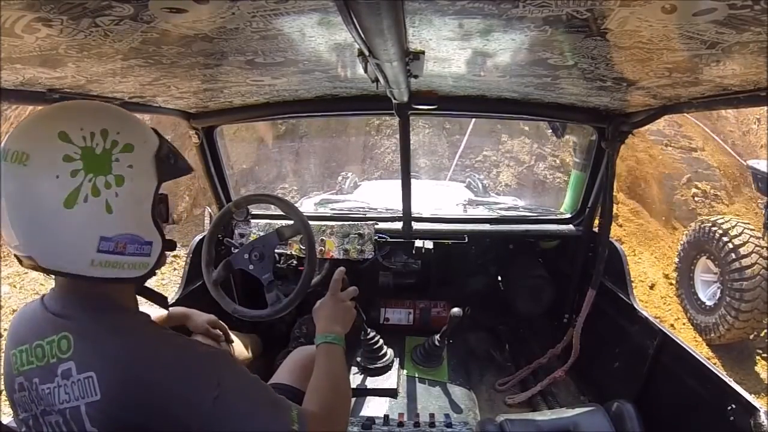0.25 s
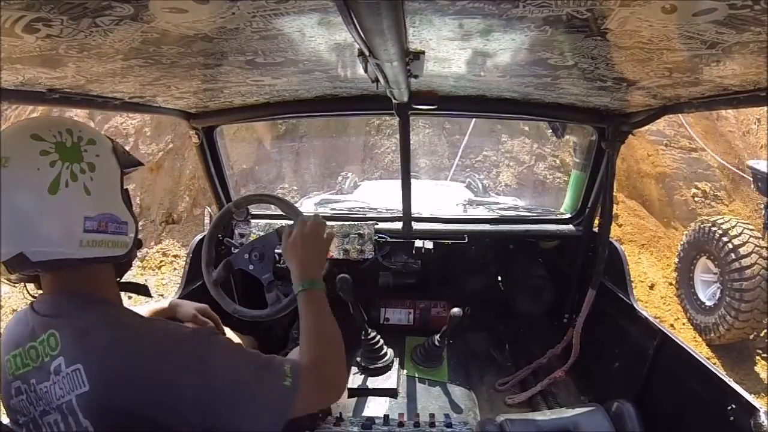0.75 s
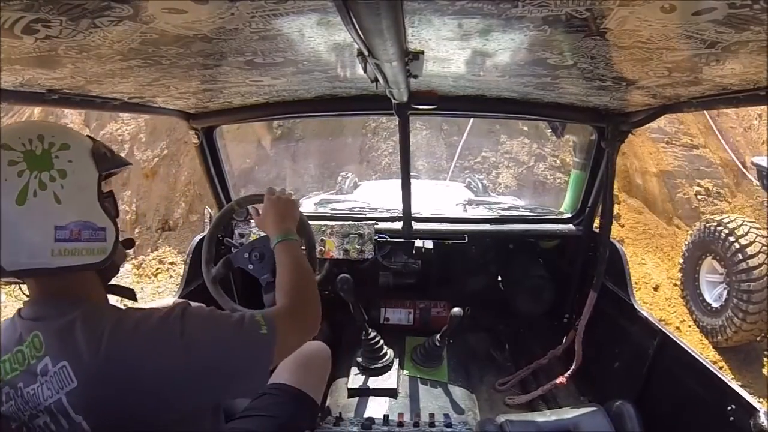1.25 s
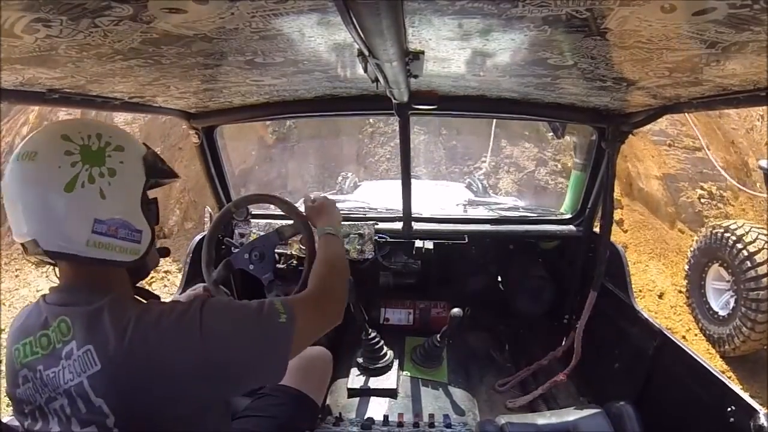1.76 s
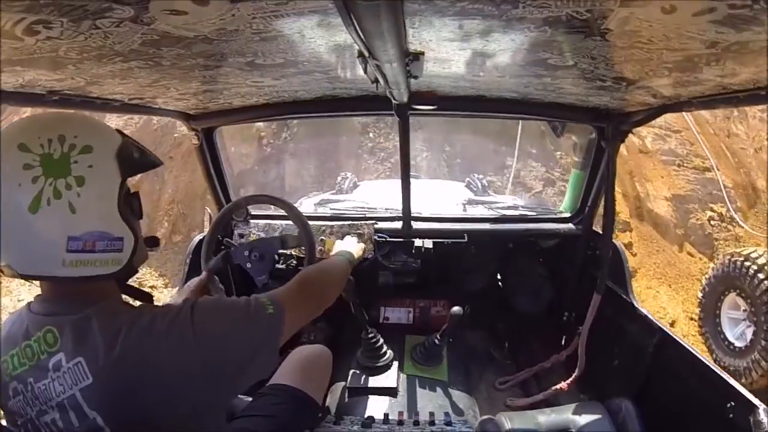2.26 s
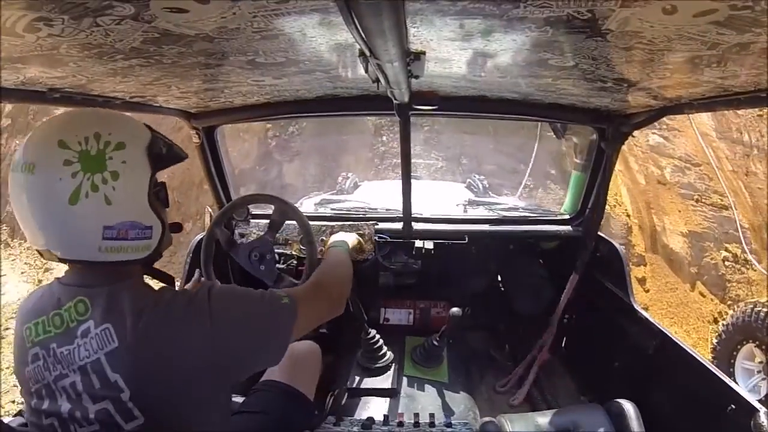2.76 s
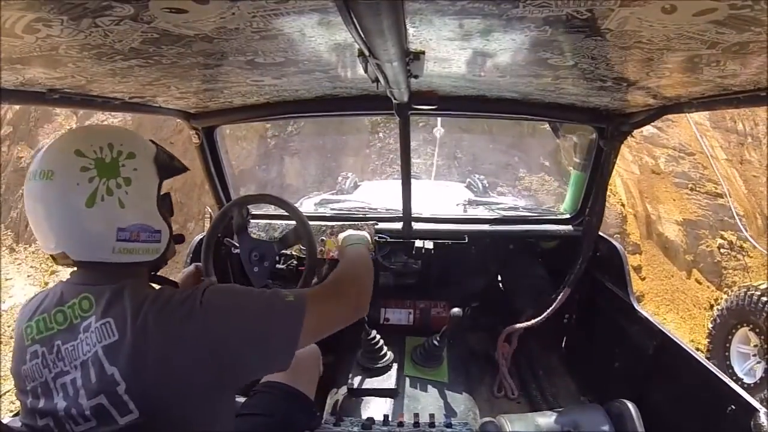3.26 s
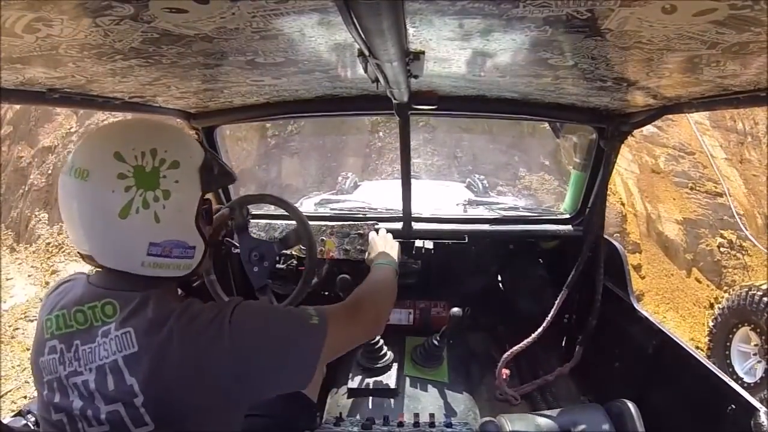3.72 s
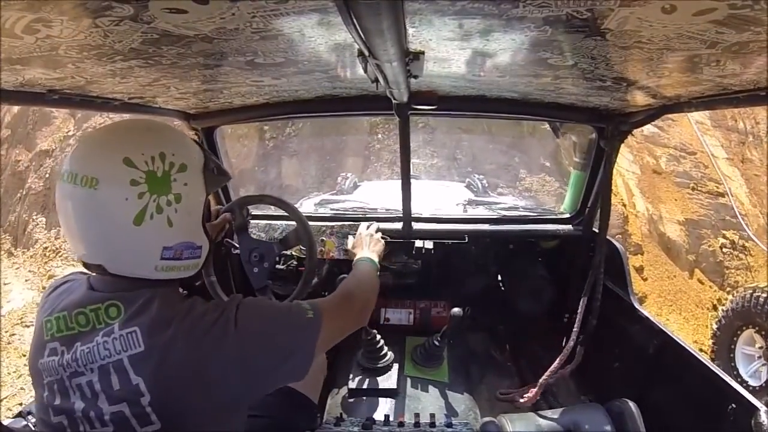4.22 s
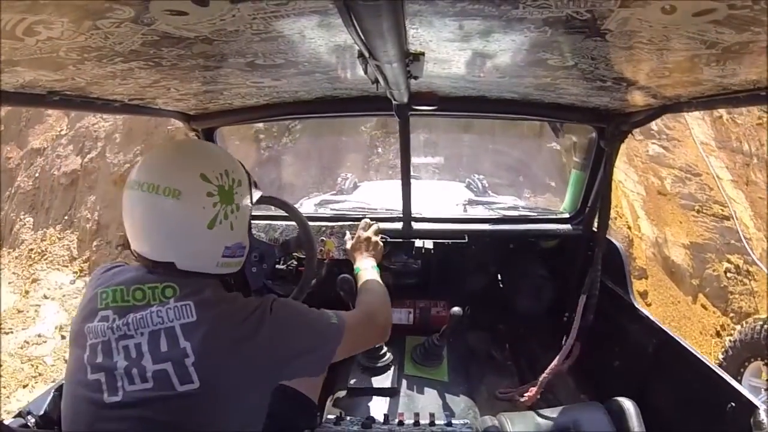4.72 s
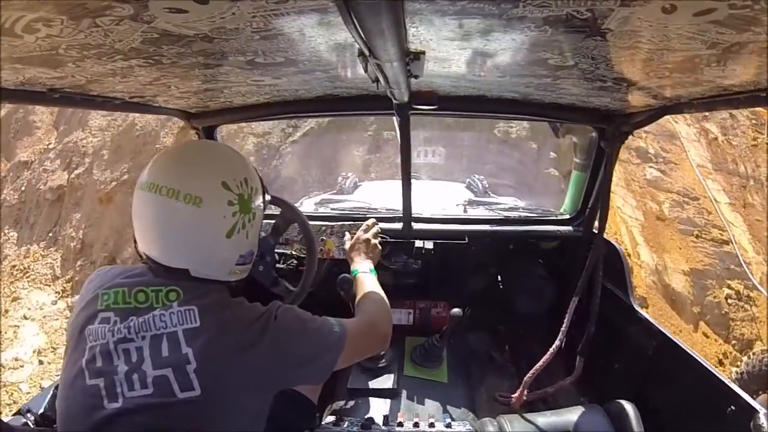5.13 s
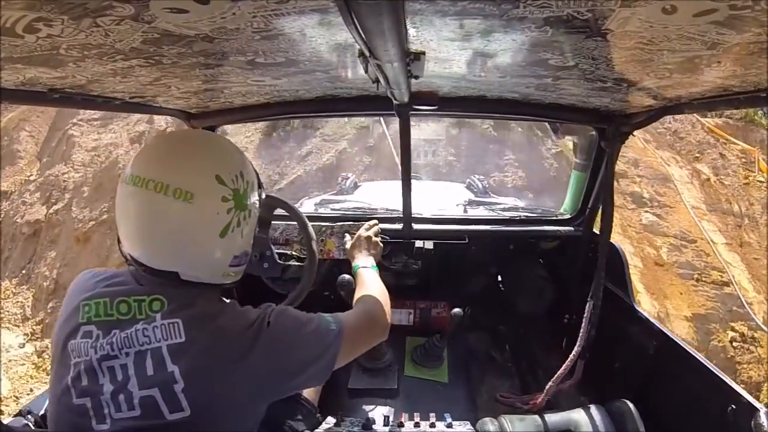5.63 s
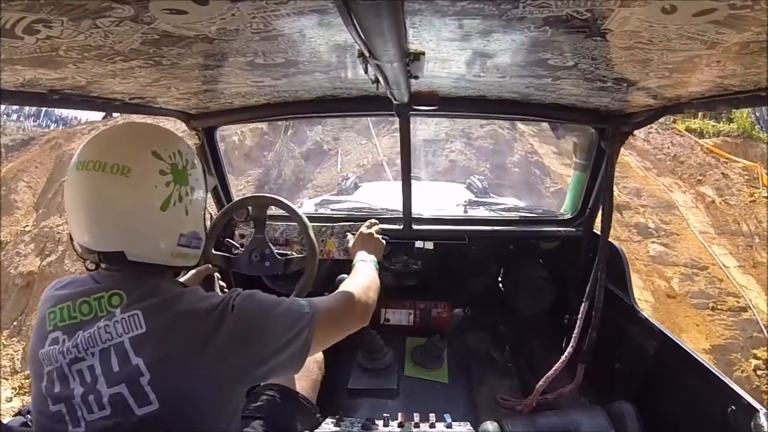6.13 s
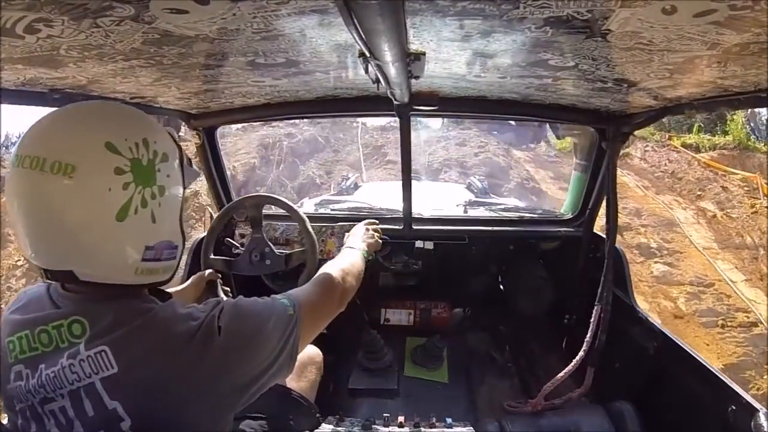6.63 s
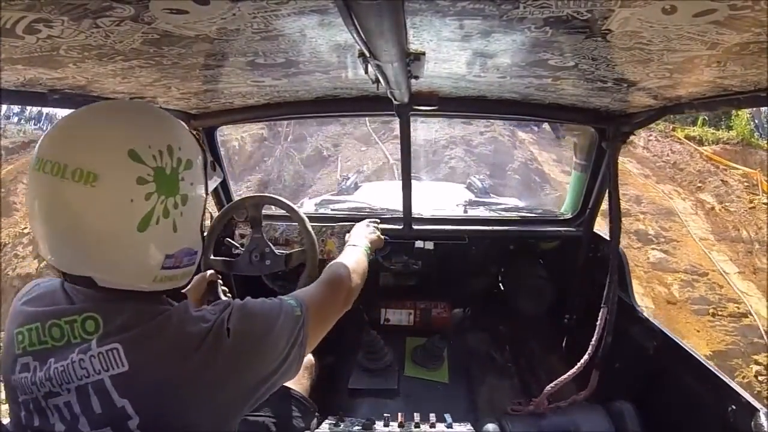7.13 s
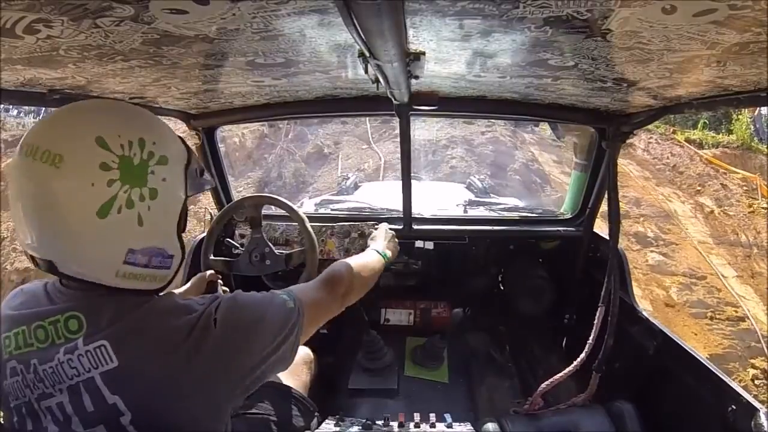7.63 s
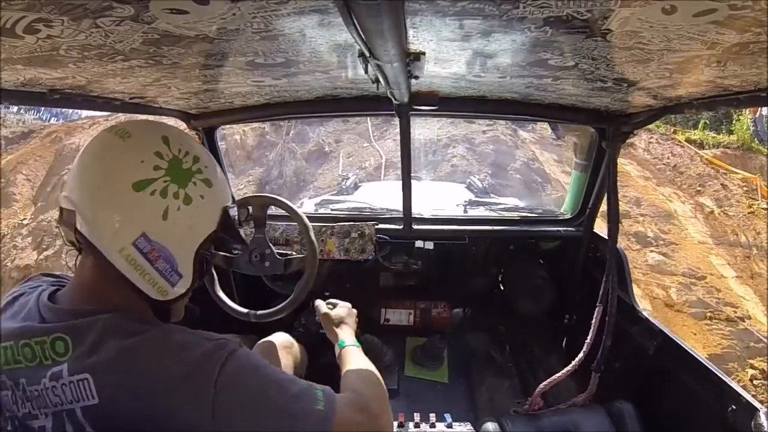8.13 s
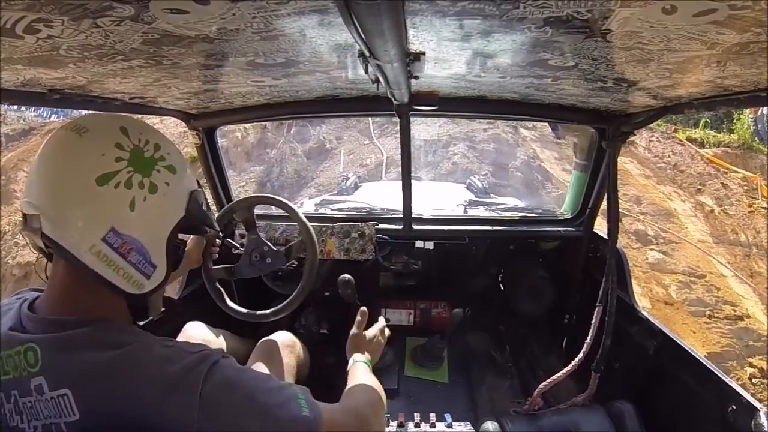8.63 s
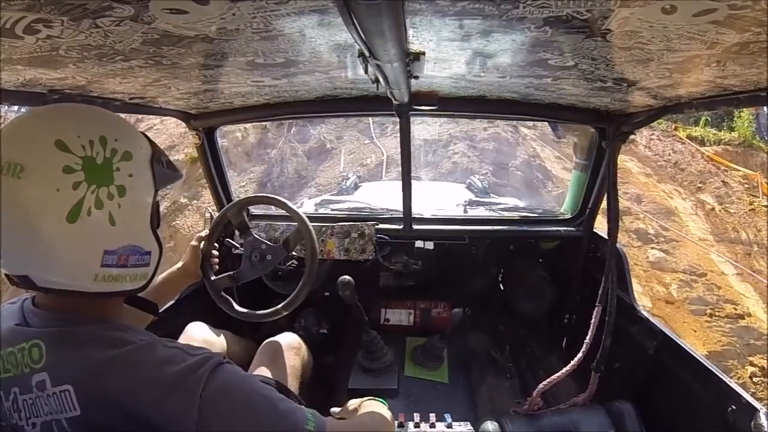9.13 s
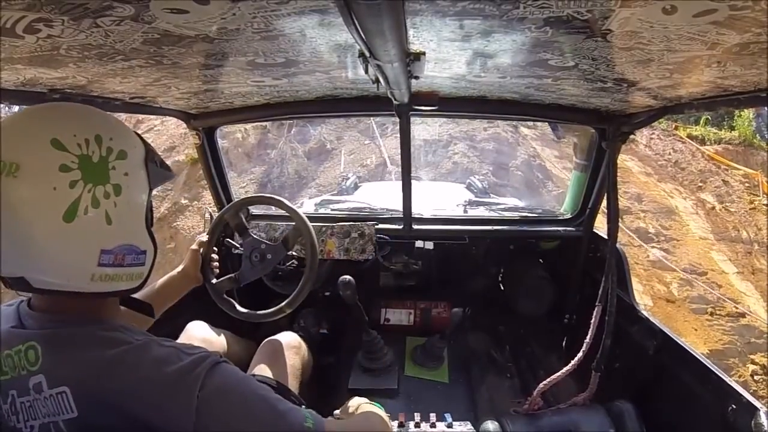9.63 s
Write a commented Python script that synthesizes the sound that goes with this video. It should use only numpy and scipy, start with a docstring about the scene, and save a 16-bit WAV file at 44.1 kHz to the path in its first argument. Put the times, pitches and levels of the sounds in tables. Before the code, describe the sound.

A turbo-diesel buggy crawls uphill on dirt, heard from its open cabin: a booming, clattering engine over chassis rumble and thin intake hiss. A thump and clank hit at 1 second. The engine sags to a ticking near-idle around 2.4 seconds, then picks up with a few bumps. The turbo whistles sharply upward from 3.5 to 4 seconds, with another thump, and winds down faintly by 5.5. The revs sag again near 4.8 and recover. A loose metal part close by starts knocking at 4.3 seconds and rattles rapidly and loudly from 5 to 6.7, in step with the engine. After a slight dip, the revs climb highest around 7 seconds. Heavy thumps, clanks and short squeaks come between 7.5 and 7.8. The rapid knocking returns strongly from 8.6 until the end near 10 seconds, with a squeak at 9.4, as the engine eases.

```python
"""Turbo-diesel buggy on a dirt track.

The microphone rides in the open cabin as the buggy crawls uphill. The engine booms, sags almost to
idle twice and picks up again; the turbo whistles up once and winds down. Close by, a loose part
knocks in step with the engine's shaking, and the chassis thumps, clanks and squeaks over ruts."""
import sys
import numpy as np
from scipy import signal
from scipy.fft import rfft, irfft
from scipy.io import wavfile

SR = 44100
rng = np.random.default_rng(int(sys.argv[2]) if len(sys.argv) > 2 else 0)


def bounce(signal):
    """Save signal as a 16-bit WAV file at the path given by the first command-line argument."""
    frames = np.transpose(np.atleast_2d(signal))
    limited = np.clip(frames, -1, 1)
    pcm = np.round(limited * 32767).astype(np.int16)
    wavfile.write(sys.argv[1], SR, pcm)


N = 435266
TIME = np.arange(N) / SR

# How hard the track shakes the chassis. Each row: time in seconds, level in dB.
SHAKING = [(0.0, -42.5), (1.04, -41.5), (1.29, -45.5), (2.27, -50.5), (2.69, -46.5), (2.85, -50),
           (3.1, -51), (3.87, -42), (4.74, -46), (5.37, -45), (5.51, -44), (6.01, -47.5), (6.45, -41),
           (6.61, -44), (6.83, -47.5), (7.73, -41.5), (8.2, -42.5), (9.85, -36)]


def amp(db):
    """Decibels to gain."""
    return 10 ** (np.asarray(db) / 20)


def unit(x):
    """Scales to rms 1."""
    return x / np.sqrt(np.mean(x ** 2) + 1e-20)


def curves(rows):
    """The columns of a timed table, one value a sample."""
    s, *columns = np.transpose(rows)
    return [np.interp(TIME, s, c) for c in columns]


def swing(rows):
    """A level curve in dB above and below its own average."""
    db, = curves(rows)
    return db - db.mean()


def add(mix, s, sound):
    """Mixes a sound in at s seconds."""
    part = mix[max(round(s * SR), 0):][:len(sound)]
    part += sound[:len(part)]


def noise(spectrum, ripple_db=2.5, spacing_hz=28):
    """Noise of rms 1, with a random ripple across its (Hz, dB) spectrum for a faint tonal colour."""
    hz, db = np.transpose(spectrum)
    bins = np.fft.rfftfreq(N, 1 / SR)
    ripple_points = rng.standard_normal(4096)
    ripple = np.interp(bins / spacing_hz, np.arange(len(ripple_points)), ripple_points)
    ripple *= np.minimum(bins / 600, 1)
    colour = amp(np.interp(np.log(bins + 1), np.log(hz), db, right=-100) + ripple_db * ripple)
    return unit(irfft(rfft(rng.standard_normal(N)) * colour, N))


def wander(rate):
    """A smooth random curve of rms 1 that changes about rate times a second."""
    coarse = rfft(rng.standard_normal(8192))
    slow = irfft(coarse / (1 + (np.arange(len(coarse)) / TIME[-1] / rate) ** 4))
    return unit(np.interp(TIME, np.linspace(0, TIME[-1], len(slow)), slow))


def angle(hz):
    """Running phase of a frequency curve."""
    return 2 * np.pi * np.cumsum(hz) / SR


def ring(modes):
    """Causal impulse response, peak 1, of steep-sided resonances given as (Hz, width in Hz, dB)."""
    hz = np.fft.rfftfreq(4096, 1 / SR)
    gain = np.sqrt(sum(amp(db) ** 2 / (1 + ((hz - f) / width) ** 2) ** 3 for f, width, db in modes))
    log_gain = np.log(np.r_[gain, gain[-2:0:-1]] + 1e-5)
    response = np.fft.ifft(np.exp(np.conj(signal.hilbert(log_gain)))).real
    return response / abs(response).max()


def idling(hz, idle_hz=34, span_hz=9):
    """1 near idle, 0 when the engine pulls."""
    return np.clip(1 - (hz - idle_hz) / span_hz, 0, 1)


def loaded(average_db, slope):
    """Level in dB of a layer that follows the engine load, by slope dB per dB."""
    # Load, as the air the engine draws. Each row: time in seconds, level in dB.
    load = [(0.0, -49), (0.98, -48.5), (1.28, -55), (1.85, -55.5), (2.05, -62), (2.45, -63.5), (3.41, -54),
            (3.82, -44.5), (4.09, -47.5), (4.56, -59), (5.79, -56.5), (6.03, -61.5), (6.77, -59.5),
            (7.26, -53), (7.53, -51.5), (8.02, -56), (8.54, -51), (9.8, -56)]
    return average_db + slope * swing(load)


def whistle(rows, flutter, fuzz):
    """A tone of rushing air, blurred in pitch and level by turbulence."""
    hz, db = curves(rows)
    phase = angle(hz * (1 + flutter * wander(250)))
    return amp(db) * np.sqrt(2) * np.sin(phase) * unit(1 + fuzz * wander(120))


def intake_whistles():
    """Air drawn through the intake sings two thin, nearly steady notes."""
    # Each row: time in seconds, pitch in Hz, level in dB.
    low = [(0, 3975, -49), (1.1, 3930, -54), (1.5, 3960, -60.5), (2.9, 3990, -67), (3.2, 3973, -54),
           (3.5, 3969, -60), (3.75, 4050, -74), (7.3, 3928, -77), (8.6, 3928, -58.5), (9.87, 3950, -64)]
    high = [(0, 4960, -51.5), (1.5, 5070, -58.5), (2.7, 5020, -68.5), (5.45, 5030, -77.5), (5.9, 5118, -56),
            (6.1, 5124, -67.5), (7, 5043, -62), (7.6, 5110, -58), (8, 5057, -62), (8.5, 5135, -53.5),
            (9.1, 4980, -66), (9.87, 5013, -68)]
    return whistle(low, flutter=.005, fuzz=0.56) + whistle(high, flutter=.005, fuzz=0.65)


def intake_hiss(beat, pulse=0.083):
    """Indrawn air hisses with the load and swells at each firing."""
    # Spectra of the hiss and the higher rush. Each row: frequency in Hz, density in dB.
    hiss = [(2000, -18), (2600, -2.5), (2900, -1.5), (3200, 5.5), (3450, 4), (3950, 3), (4250, -12),
            (4700, -5), (5080, 3), (5400, -3), (6400, -5), (7900, -5.5), (9000, -22.5), (12000, -41.5)]
    rush = [(3000, -19.5), (6500, -6.5), (8400, 7), (9200, 1.5), (11400, 2), (12200, -1.5), (13200, -4),
            (13800, -2), (14800, -9), (15500, -11)]
    air = amp(loaded(-51, slope=0.99)) * noise(hiss) + amp(loaded(-64.5, slope=1.03)) * noise(rush)
    return air * (1 + pulse * beat) * amp(1.2 * wander(21))


def turbo():
    """The turbo whistles up once and winds down."""
    # Each row: time in seconds, pitch in Hz, level in dB.
    spool = [(3.4, 3894, -77), (3.56, 4250, -56), (3.68, 5188, -52), (3.8, 6800, -43), (3.88, 7885, -42),
             (3.96, 9500, -55), (4.02, 9200, -66), (4.3, 8810, -56), (4.45, 8425, -68), (4.7, 7640, -86),
             (5.15, 5688, -68), (5.28, 5323, -62), (5.42, 5120, -56), (5.6, 5070, -87)]
    return whistle(spool, flutter=0.017, fuzz=0.36)


def squeaks(flutter=.008, catch=.4):
    """A suspension joint slips with a short, unsteady glide."""
    # Each row: start and length in seconds, first and last pitch in Hz, level in dB.
    slips = [(2.594, 0.082, 598, 746, -41), (3.803, 0.086, 602, 650, -39.5),
             (4.711, 0.096, 1459, 1443, -38.5), (6.835, 0.058, 726, 651, -42),
             (7.052, 0.038, 560, 722, -36), (7.48, .05, 521, 452, -33.5),
             (7.678, 0.0837, 1564, 1318, -27.5), (7.75, 0.048, 399.3, 561.4, -38),
             (9.373, 0.17, 1504, 1612, -27.5)]
    out, waver = np.zeros(N), 1 + flutter * wander(150)
    for s, length, start_hz, end_hz, db in slips:
        hz = np.linspace(start_hz, end_hz, int(length * SR))
        hz *= waver[int(s * SR):][:len(hz)]
        add(out, s, amp(db) * np.sqrt(2) * np.sin(angle(hz)) * signal.windows.tukey(len(hz), .7))
    return out * unit(1 + catch * wander(90))  # the joint catches and lets go


def clanks(t60=0.11):
    """Short chattering contacts ring the chassis metal."""
    # Each row: start in seconds, level in dB.
    contacts = [(1.013, -17), (2.813, -25), (2.905, -39), (3.085, -32), (3.85, -26), (7.513, -26),
                (7.638, -16.5), (7.646, -43), (7.722, -27.5), (8.275, -29)]
    # The metal's modes. Each row: frequency and width in Hz, relative level in dB.
    modes = [(607, 125, -2.5), (845, 97, -3), (1324, 160, -2), (1554, 200, 2), (1855, 100, -0.5),
             (2190, 100, -12.5), (3430, 1100, -29), (6500, 1600, -40)]
    out, t = np.zeros(N), np.arange(SR // 8) / SR
    metal = ring(modes)
    for s, db in contacts:
        chatter = rng.standard_normal(len(t)) * amp(db - 60 * t / t60)
        add(out, s, signal.fftconvolve(chatter, metal / np.linalg.norm(metal)))
    return out


def chassis_rumble(rumble_db=-43, boom_db=-28):
    """The track shakes the chassis into a rumble, and the cabin booms with it."""
    # Spectra. Each row: frequency in Hz, density in dB.
    rumble = [(100, -11), (190, 2), (260, 1), (335, 3.5), (420, -4), (520, 1), (650, -1.5), (740, -4),
              (840, -3), (1020, -11.5), (2000, -54.5)]
    boom = [(15, -21), (33, 4.5), (65, -16), (90, 7.5), (125, -6), (170, -10.5), (230, -19), (400, -50)]
    shaking_db, jolts_db = swing(SHAKING), 2.5 * wander(11)
    out = amp(rumble_db + shaking_db + jolts_db) * noise(rumble)
    return out + amp(boom_db + 0.72 * shaking_db + jolts_db) * noise(boom)


def thumps(rise_s=0.0027, crunch_db=-15, crunch_t60=0.1):
    """A wheel drops into a rut: the cabin booms while dirt crunches under the tyre."""
    # Each row: start in seconds, strength in dB.
    ruts = [(1.012, -17), (2.629, -17.5), (2.798, -22), (3.83, -15.5), (6.865, -23), (7.06, -19),
            (7.5, -9.5), (7.549, -13), (7.794, -11.5), (8.66, -16), (9.39, -32)]
    # Each row: frequency in Hz, relative level in dB, seconds to fall 60 dB.
    cabin_modes = [(33, -10, .3), (90.3, 6, 0.81), (113.5, -4, 0.048), (160, -42, .12)]
    out, t = np.zeros(N), np.arange(SR // 2) / SR
    boom = sum(amp(db - 60 * t / t60) * np.sin(2 * np.pi * hz * t) for hz, db, t60 in cabin_modes)
    band = signal.butter(2, [230, 560], "band", fs=SR, output="sos")
    for s, db in ruts:
        dirt = unit(signal.sosfilt(band, rng.standard_normal(len(t))))
        crunch = dirt * amp(crunch_db - 60 * t / crunch_t60)
        add(out, s, amp(db) * (boom + crunch) * (1 - np.exp(-t / rise_s)))
    return out


def injectors(firing, idle, tick_db=-38, idle_lift_db=7, tick_t60=0.015, ring_db=-45, ring_t60=0.13):
    """One dry tick at every firing; near idle it stands out and rings a cover on the engine."""
    # Each row: frequency in Hz, density in dB.
    tick_spectrum = [(200, -6), (600, 4), (1050, -10), (1400, 1.5), (1900, -0.5), (2400, -16), (3300, -15),
                     (5000, -22.5), (8000, -29), (14000, -42)]
    t, ticks, ringing = np.arange(SR // 25) / SR, np.zeros(N), np.zeros(N)
    starts = np.flatnonzero(np.diff(firing // (2 * np.pi))) / SR
    scatter_db = rng.uniform(-2, 2, len(starts))
    onset = np.sin(np.pi / 2 * np.minimum(t / .0012, 1)) ** 2
    for s, db in zip(starts, scatter_db):
        add(ticks, s, onset * amp(tick_db + db - 60 * t / tick_t60))
        add(ringing, s, onset * amp(ring_db + db - 60 * t / ring_t60))
    cover = noise([(1400, -40), (1900, 8), (2400, -27), (4000, -68.5)])
    return ticks * amp(idle_lift_db * idle) * noise(tick_spectrum) + ringing * idle * cover


def combustion_clatter(beat, pulse=0.066):
    """Diesel clatter grows with load and shaking, and swells at each firing."""
    # Each row: frequency in Hz, density in dB.
    spectrum = [(900, -33.5), (1080, -23.5), (1170, -6.5), (1280, -2), (1400, -1), (1580, 3), (1800, -6),
                (1930, -5), (2100, -9.5), (2400, -11.5), (2650, -25.5), (4000, -40.5)]
    db = loaded(-40.5, slope=0.49) + 0.61 * swing(SHAKING) + 1.4 * wander(29)
    return amp(db) * (1 + pulse * beat) * noise(spectrum)


def blows(firing, scatter_db=0.64):
    """The loose part strikes once a firing, in bouts; yields (seconds, dB, hardness) for each blow."""
    # Each row: start in seconds, number of blows, first level in dB, change over the bout in dB,
    # hardness of the contact from 0 to 1, dB taken off every second blow.
    bouts = [(1.012, 1, -13, 4, .6, 0), (1.2119, 1, -13, 0, 0.25, 0), (2.8109, 1, -20, 0, 0.6, 0),
             (4.28, 3, -16, 10, 0.73, 0.5), (4.9822, 3, -17.5, 9, 0.97, -3.5),
             (5.0901, 1, -5.5, 0, 0.94, 0), (5.4054, 3, -9, -3, 0.2, -4.5),
             (5.4719, 5, -2.5, -4, 0.43, 4.5), (5.6045, 5, -6, -2.5, 0.16, 19), (5.78, 1, -9.5, -3, 0, -2),
             (5.9308, 1, -8.5, 0, 0, 3), (5.9729, 5, -5.5, -1.5, 0.25, 18),
             (6.1081, 5, -10.5, 5.5, .15, 36), (6.2419, 3, -5, -7.5, 0.36, 0),
             (6.3106, 7, -4, -1, 0.37, 3.5), (6.472, 6, -2.5, -9, 0.6, 2.5),
             (6.6139, 3, -16, -3.5, 0.45, -7.5), (6.7092, 3, -19.5, 0, 0.2, 18),
             (6.9799, 1, -18.5, 0, 0, 0), (7.9295, 2, -15, -6, 0.68, 0), (8.029, 1, -14, 0, .8, 0),
             (8.4092, 1, -16.5, 0, 1, 0), (8.6609, 2, -5.5, -3, .9, 2), (8.7216, 1, -9, 0, .3, 0),
             (8.8804, 3, -12, 4, .85, -3.5), (8.9417, 3, -3, -18.5, .95, -2), (9.0216, 1, -17, -4, .9, 0),
             (9.0647, 6, -13, 6.5, 0.77, 5.5), (9.1893, 2, -11, -12, 1, 2), (9.2309, 4, -10, -13, 0.9, 1.5),
             (9.315, 5, -12, 0.5, .85, 11), (9.4592, 5, -10, -20, 0.77, 2), (9.524, 5, -14, 2.5, 0.88, 7),
             (9.653, 5, -8, -5.5, 0.84, -2), (9.764, 3, -7, -1.5, .88, 3), (9.8341, 2, -5, -9, 0.86, -4)]
    for start, count, first_db, change_db, hardness, limp_db in bouts:
        k = np.arange(count)
        times = np.interp(np.interp(start, TIME, firing) + 2 * np.pi * k, firing, TIME)
        levels = first_db + change_db * k / max(count - 1, 1) - limp_db * (k % 2)
        levels += scatter_db * rng.standard_normal(count) * (k > 0)
        yield from ((s, db, hardness) for s, db in zip(times, levels))


def loose_part(firing, scatter_db=2.4, echo_db=-18, echo_t60=0.16):
    """Each blow rings the same modes, in a balance set by its hardness; the cabin echoes briefly."""
    # Each row: frequency and width in Hz, relative level in dB at a soft contact and at a hard one.
    modes = [(281, 160, -18.5, -10), (702, 76, -9.5, -23.5), (815, 95, -17, -5), (1175.5, 32.3, -0.5, -2.5),
             (1268.6, 62, -1.5, -16.5), (1471, 110, 6, -1.5), (1644, 103, -0.5, 2.5), (1763, 105, -8, -1.5),
             (2090, 90, -16.5, -19), (2419.2, 138, -18, -13.5), (2740, 270, -27.5, -23),
             (3620, 130, -42, -34)]
    mode_hz, width, soft_db, hard_db = np.transpose(modes)
    out, t = np.zeros(N), np.arange(SR // 8) / SR
    echo_shape = amp(-60 * t / echo_t60) * (t > .004)
    for s, db, hardness in blows(firing):
        mode_db = soft_db + hardness * (hard_db - soft_db) + scatter_db * rng.standard_normal(len(modes))
        knock = amp(db) * ring(zip(mode_hz, width, mode_db))
        echo = rng.standard_normal(len(t)) * echo_shape / np.linalg.norm(echo_shape)
        add(out, s, knock)
        add(out, s, amp(echo_db) * signal.fftconvolve(knock, echo))
    return out


def exhaust(hz, firing, dull_db=3):
    """A thud at the firing rate and a drone an octave up, with weaker lines that grow dull near idle."""
    # Each row: time in seconds, strength of the thud and of the overtones in dB.
    strengths = [(0, -3.5, 1), (.95, 0.5, 2), (1.3, -4.5, 3.5), (1.85, 1, 8.5), (2.4, -0.5, -3.5),
                 (3.3, -2, 0.5), (3.85, 0.5, -2), (4.3, 0.5, 3), (4.8, 0, 1), (5.2, -5.5, -8),
                 (5.6, -5, -2), (6.5, -13, 6.5), (7.0, -3, -5), (7.8, -3, 0), (8.5, 3, 1), (9.0, -4.5, 1.5),
                 (9.87, -8, -7.5)]
    # Each row: time in seconds, strength of the drone in dB.
    drone = [(0, 2.5), (.98, 0), (1.12, 5.5), (1.7, 4.5), (1.9, 5.5), (2.6, -3.5), (2.8, -17), (2.92, 1.5),
             (3.2, -3), (3.9, -6), (4.03, 4.5), (4.85, 1), (5.05, -1.5), (5.45, -13), (5.85, 2.5),
             (6.3, -7), (6.8, -12), (6.9, 0.5), (7.03, -9.5), (7.35, 2), (8.1, -5.5), (8.55, 3.5),
             (8.75, -3), (9.4, 2.5), (9.87, -0.5)]
    # Resonances swell passing tones: the cabin's lift thud and drone, the panels' the weaker lines.
    # Each row: frequency in Hz, gain in dB.
    cabin = [(32, -8), (36, -7), (40, -10), (43, -14), (45.5, -21.5), (49, -17), (53, -16.5), (65, -26.5),
             (75, -32), (82, -20), (88, -14.5), (92, -13), (97, -15.5), (107, -19)]
    panels = [(120, -2), (143, 2.5), (165, -1.5), (215, 0.5), (260, -1.5), (300, 0), (338, 6), (375, -3.5),
              (413, 2.5), (470, 2)]
    # Lines from unequal cylinders. Each row: multiple of the firing rate, dB relative to the drone.
    uneven = [(.5, -29.5), (.75, -11), (1.25, -34.5), (1.5, -46.5), (1.75, -12), (2.25, -26), (2.5, -21)]
    # Each row: multiple of the firing rate (8.35 is a belt-driven pulley), relative level in dB.
    overtones = [(3, -0.5), (3.25, -8), (3.5, -10), (4, -7), (4.5, -25), (5, -15.5), (6, -17.5), (6.5, -21),
                 (7, -23), (8.35, -16.5), (9, -33), (10, -24.5), (13, -21)]
    thud_db, overtone_db = curves(strengths)
    drone_db, = curves(drone)
    pulling = 1 - idling(hz)  # thud and drone waver more while the engine pulls
    thud_db += np.interp(hz, *np.transpose(cabin)) + 2 * pulling * wander(7.7)
    drone_db += np.interp(2 * hz, *np.transpose(cabin)) + pulling * wander(8.6)
    overtone_db += loaded(-37.5, slope=0.67)
    out = amp(thud_db) * np.cos(firing)
    out += amp(drone_db) * (1 + 0.025 * wander(2.6)) * np.sin(2 * firing)
    idle = idling(hz, span_hz=16.5)
    for lines, level_db, waver in ((uneven, drone_db, 0.24), (overtones, overtone_db, 0.17)):
        for multiple, db in lines:
            phase = multiple * firing + 2 * np.pi * rng.random() + waver * wander(5.6)
            loss_db = dull_db * idle * max(multiple - 3, 0)
            panel_db = np.interp(multiple * hz, *np.transpose(panels))
            out += amp(level_db + db + panel_db - loss_db) * (1 + waver * wander(5.7)) * np.cos(phase)
    return np.sqrt(2) * out


def scene():
    """Engine, turbo and chassis as they meet at one microphone in the cabin."""
    # Engine speed. Each row: time in seconds, firing rate in Hz.
    speed = [(0, 49.35), (1.0, 49.93), (1.12, 46.9), (1.4, 45.52), (1.7, 41.6), (1.95, 36.67), (2.4, 32.73),
             (2.6, 35.62), (2.8, 44.34), (3.2, 47.96), (3.95, 47.57), (4.25, 43.75), (4.48, 35.77),
             (4.85, 32.7), (5.4, 44.47), (5.85, 46.7), (6.0, 45), (6.3, 44.03), (6.55, 42.5), (6.75, 40.47),
             (6.98, 52.06), (7.2, 54.44), (7.8, 52.1), (8.65, 52.21), (9.05, 47.97), (9.52, 48.06),
             (9.87, 41.77)]
    hz, = curves(speed)
    firing = angle(hz)  # one turn of phase a firing
    mix = exhaust(hz, firing)
    beat = np.cos(firing + .5 * wander(30))  # crests near each firing
    mix += chassis_rumble() + combustion_clatter(beat) + intake_hiss(beat)
    mix += injectors(firing, idling(hz)) + turbo() + intake_whistles()
    mix += loose_part(firing) + thumps() + clanks() + squeaks()
    return mix[None]


def record(dry, knee=.76, headroom=.2, fade_s=.004, edge_hz=15250):
    """Soft ends, a soft knee that rounds the tallest peaks, and the camera's band limit."""
    ends = np.sin(np.pi / 2 * np.minimum(np.minimum(TIME, TIME[-1] - TIME) / fade_s, 1)) ** 2
    body = np.clip(dry, -knee, knee)
    rounded = body + headroom * np.tanh((dry - body) / headroom)
    lowpass = signal.firwin(511, edge_hz, window=("kaiser", 9), fs=SR)
    return signal.oaconvolve(rounded * ends, lowpass[None], "same")


dry = scene()
out = record(dry)
bounce(out)
```